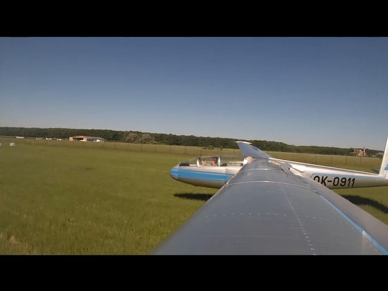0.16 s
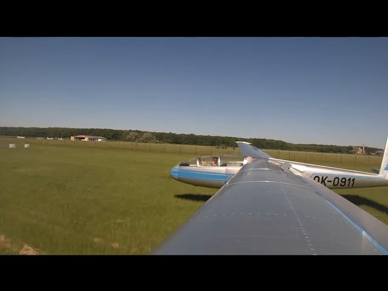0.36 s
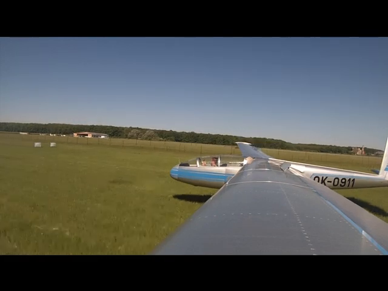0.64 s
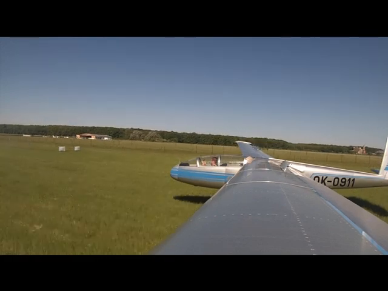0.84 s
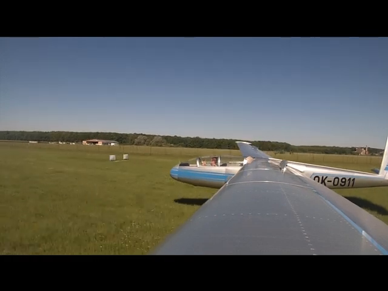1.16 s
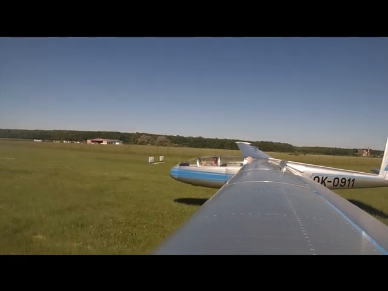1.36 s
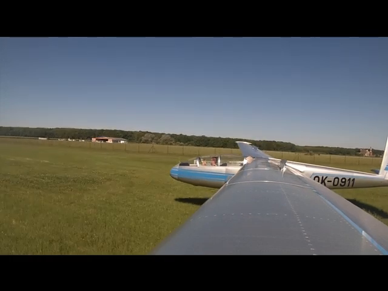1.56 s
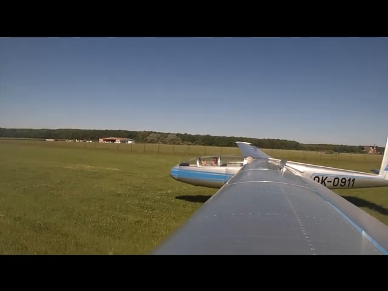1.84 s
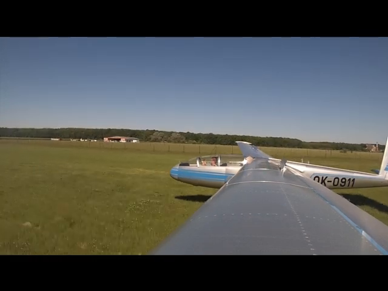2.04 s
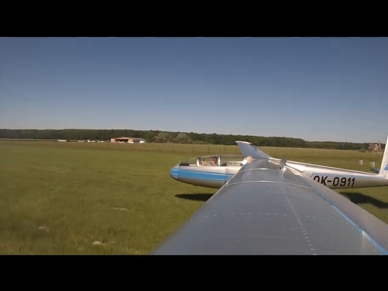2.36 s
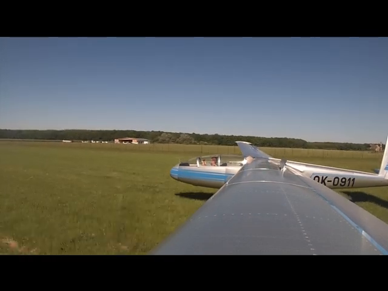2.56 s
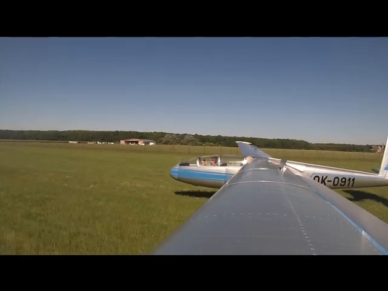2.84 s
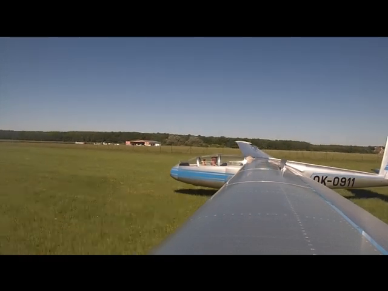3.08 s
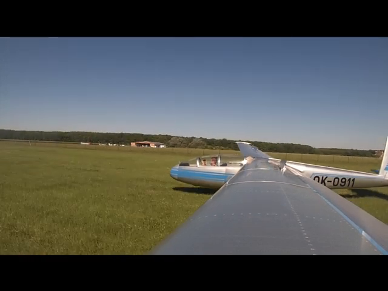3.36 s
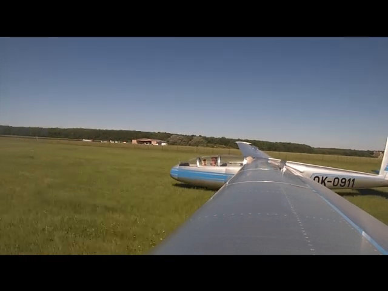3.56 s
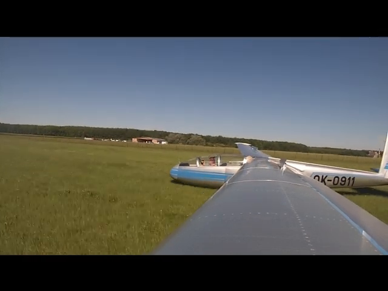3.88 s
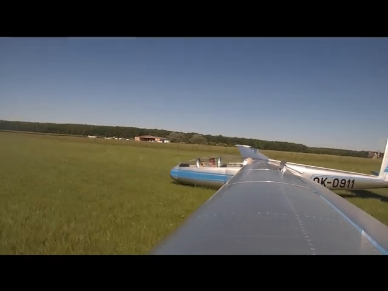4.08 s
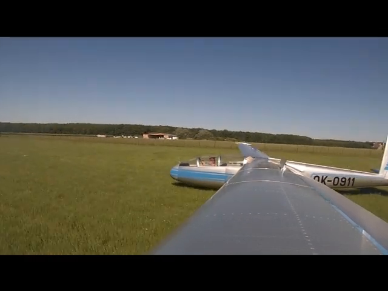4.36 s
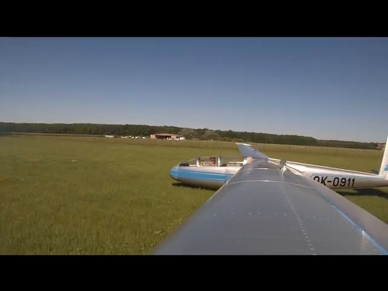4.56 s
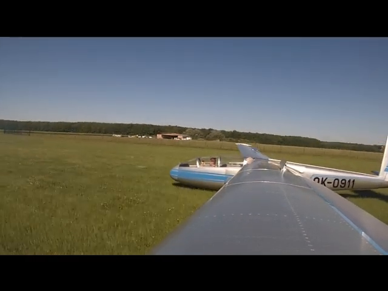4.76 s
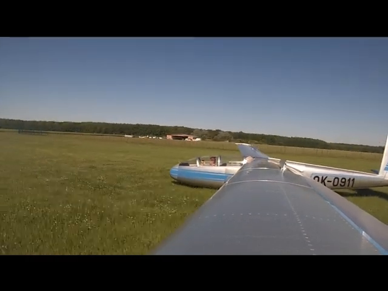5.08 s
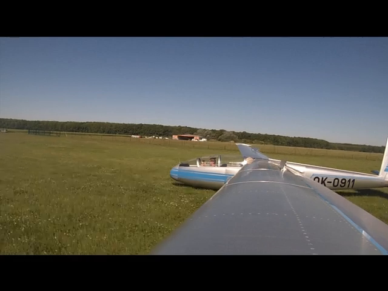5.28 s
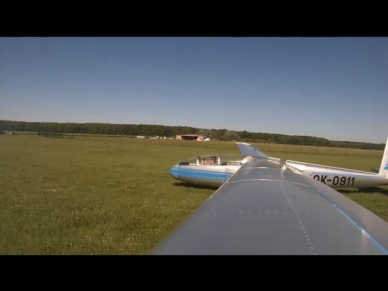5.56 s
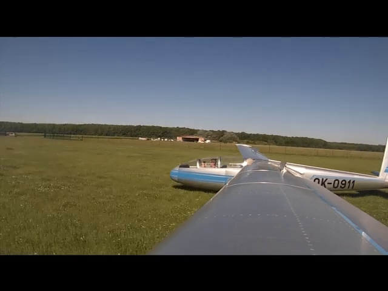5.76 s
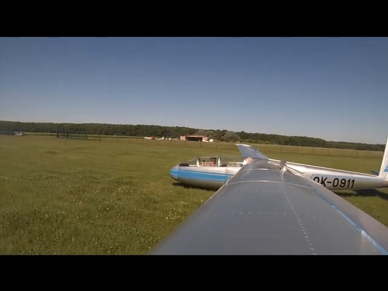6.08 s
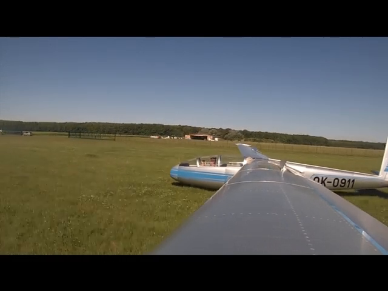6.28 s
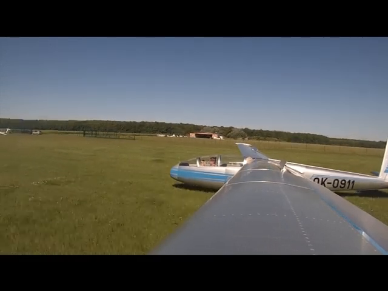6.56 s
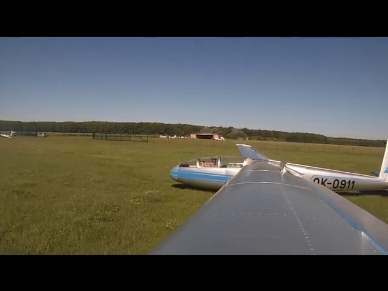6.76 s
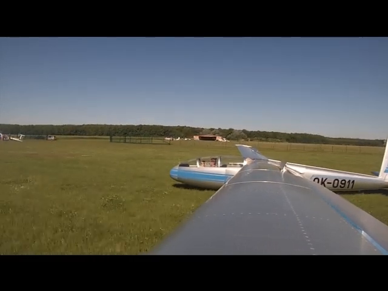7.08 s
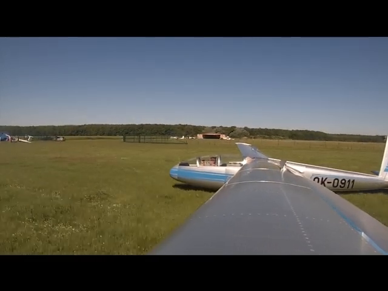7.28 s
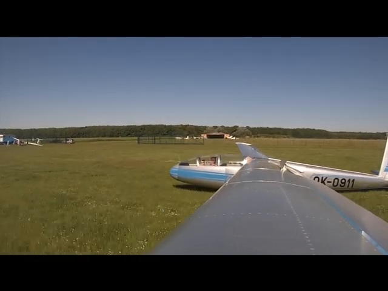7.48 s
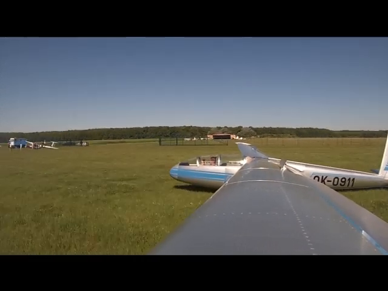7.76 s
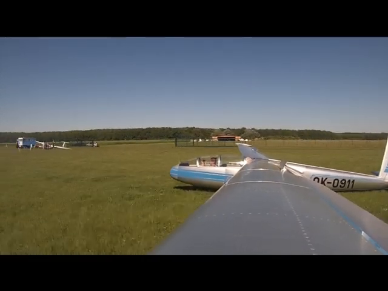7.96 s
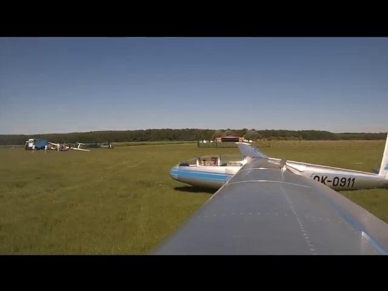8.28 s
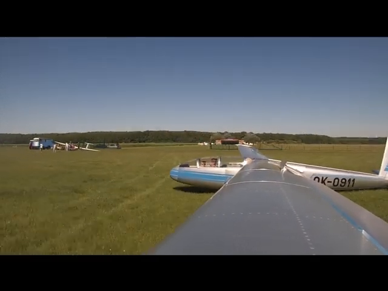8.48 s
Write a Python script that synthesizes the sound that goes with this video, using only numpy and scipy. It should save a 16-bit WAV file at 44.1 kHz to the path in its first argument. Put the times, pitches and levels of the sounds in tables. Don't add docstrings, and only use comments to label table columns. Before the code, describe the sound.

Steady two-tone whistle and airy hiss over a humming, shuddering metal wing, then the whistle dies and rough ground thumps and rattles grow harder.

```python
import sys
import numpy as np
from scipy import signal
from scipy.fft import rfft, irfft, next_fast_len
from scipy.io import wavfile
from scipy.ndimage import uniform_filter1d

SR = 44100
rng = np.random.default_rng(int(sys.argv[2]) if len(sys.argv) > 2 else 0)


def transcribe(u):
    v = np.clip(np.atleast_2d(u).T, -1, 1)
    q = np.round(v * 32767).astype(np.int16)
    wavfile.write(sys.argv[1], SR, q)


def volts_from_db(level):
    exponent = np.asarray(level, float) / 20
    return 10 ** exponent


N = 380583
SIZE = next_fast_len(N)
HZ = np.fft.rfftfreq(SIZE, 1 / SR)

# (time [s], volume drop [dB], thump level [dB])
HARD_PEAKS = [(0.078, 3, -28), (0.393, 0, -22), (1.023, 2, -19), (1.324, 3, -30), (1.978, 3.5, -37.5),
              (2.251, 1, -15.5), (2.509, 4.5, -12), (2.694, 4, -23), (3.041, 3, -16), (3.306, 1, -21),
              (3.681, 4, -12.5), (3.754, 2, -13), (3.846, 2, -9), (4.282, 1, -20), (4.526, 3.5, -12),
              (4.751, 2, -13), (4.865, 1, -23), (5.077, 4, -10), (5.182, 0, -7), (5.419, 3.5, -17),
              (5.65, 3, -15), (6.437, 4.5, -13), (6.562, 2.5, -20), (6.788, 1.5, -19), (6.862, 7.5, -10),
              (7.156, 2, -27), (7.74, 4, -6.5), (8.149, 9, -24), (8.5183, 6, -8.5), (8.632, -16, -10)]
# (time [s], lift [dB], half length [s])
GUSTS = [(.2, 1, 0.033), (.4, 1, 0.069), (.98, 1.5, 0.07), (1.497, 2.5, 0.093), (1.74, 2, 0.037),
         (1.88, 0.5, 0.028), (2.0, 3.5, 0.076), (2.5, 1.5, 0.053), (2.72, 2, 0.095), (3.02, 2.5, 0.057),
         (3.64, 1.5, 0.12), (3.93, 4.5, 0.049), (4.5, 3, 0.038), (4.722, 3.5, 0.026), (4.827, 2.5, 0.018),
         (5.05, 4.5, 0.062), (5.4, 4, 0.064), (5.615, 3, 0.029), (5.76, 1.5, 0.041), (6.004, 2, .04),
         (6.23, 0.5, 0.033), (6.53, 3, .033), (6.752, 3, 0.022), (6.84, 1, 0.017), (6.895, 0, 0.025),
         (7.14, 3.5, 0.014), (7.38, 1, 0.11), (7.69, 2, 0.096), (7.81, 0, .06), (8.12, 5, 0.09),
         (8.19, -3, 0.12), (8.42, 3.5, 0.048), (8.5, 1.5, 0.018), (8.56, -2.5, .04)]


def evened(x):
    return x / np.sqrt(np.mean(x ** 2) + 1e-20)


def columns(rows):
    s, *values = np.transpose(rows)
    return [np.interp(np.arange(N) / SR, s, v) for v in values]


def add(mix, s, sound):
    part = mix[round(s * SR):][:len(sound)]
    part += sound[:len(part)]


def bell(hz, centre_hz, width_hz):
    return 1 / (1 + (2 * (hz - centre_hz) / width_hz) ** 2)


def filtered(x, gain):
    return irfft(rfft(x, SIZE) * gain, SIZE)[:N]


def drift(rate_hz):
    return evened(filtered(rng.standard_normal(N), bell(HZ, 0, 2 * rate_hz)))


def swells(rows):
    t = np.arange(N) / SR
    return sum(height * np.exp(-((t - s) / half) ** 2) for s, height, half in rows)


def surges(rows):
    return swells([(s, volts_from_db(db), half) for s, db, half in rows])


def resting(floating_db, rolling_db):
    touchdown_s, settle_s = 3.7, 0.059
    rolling = np.clip((np.arange(N) / SR - touchdown_s) / settle_s, 0, 1)
    return volts_from_db(floating_db + (rolling_db - floating_db) * rolling)


def shaken(modes, steady):
    shape = np.sqrt(sum(volts_from_db(2 * db) * bell(HZ, hz, width) ** 2 for hz, width, db in modes))
    ring = signal.hilbert(filtered(rng.standard_normal(N), shape), SIZE)[:N]
    swell = np.sqrt(abs(uniform_filter1d(abs(ring) ** 2, 1500)))
    return evened(ring.real / (swell + 0.037 * swell.mean()) ** steady)


def rung(hz, width_hz, rest, surge, wander_hz):
    push = rng.standard_normal(N)
    murmur = evened(filtered(push, bell(HZ, hz, width_hz)))
    wander = evened(filtered(push, bell(HZ, 0, 8.99)))
    tone = np.sqrt(2) * np.sin(2 * np.pi * np.cumsum(hz + wander_hz * wander) / SR)
    quieted = rest * murmur / (1 + 0.7 * surge / rest)
    return quieted + surge * tone, rest + surge


def turbulence(shape_db, patchy_db, flicker_db):
    frames = N // 128 + 8
    a, b, patches = rng.standard_normal((frames, 257, 3)).T
    patches = uniform_filter1d(patches, 8, axis=0)
    patches = evened(uniform_filter1d(patches, 16, axis=1))
    flicker = evened(uniform_filter1d(rng.standard_normal(frames), 4))
    spectra = (a + 1j * b) * volts_from_db(patchy_db * patches + flicker_db * flicker)
    x = signal.istft(spectra, nperseg=512, noverlap=384)[1][:N]
    return evened(filtered(x, volts_from_db(shape_db)))


def wing():
    # (time [s], level [dB], half length [s])
    sways = [(0.045, -21.5, 0.071), (.2, -33, .05), (0.502, -23, .04), (0.757, -24.5, 0.26),
             (1.15, -30, 0.072), (1.4, -26, .04), (2.66, -24.5, 0.031), (2.998, -26, 0.045),
             (3.396, -23.5, .05), (3.952, -27, .06), (6.006, -30.5, .05), (6.75, -32, 0.09),
             (7.1, -31, .06), (8.05, -28, 0.06), (1.293, -27.5, 0.13), (2.022, -18.5, 0.1),
             (2.422, -21.5, 0.13), (2.858, -27, 0.072), (3.179, -18, 0.084), (4.083, -23.5, 0.2),
             (4.574, -22, 0.05), (4.796, -19.5, 0.13), (5.1, -12, 0.026), (5.277, -21, 0.18),
             (5.514, -15, 0.025), (5.714, -15.5, 0.14), (6.043, -23.5, 0.13), (6.473, -23, 0.12),
             (6.915, -18, 0.13), (7.263, -20.5, 0.22), (7.527, -23, 0.024), (7.964, -25, 0.042),
             (8.227, -18, 0.043), (8.516, -23, 0.19)]
    # (time [s], level [dB], half length [s])
    rocks = [(2.423, -35, 0.13), (3.749, -23.5, 0.19), (3.956, -26, 0.028), (4.334, -20, 0.036),
             (4.45, -29, 0.15), (4.729, -44, 0.15), (5.062, -27, 0.26), (5.37, -31, 0.06),
             (6.34, -30.5, 0.2), (6.57, -22, 0.06), (6.795, -27, 0.21), (7.149, -41, 0.1),
             (7.45, -26, 0.079), (7.79, -15.5, 0.054), (8.037, -25, 0.036), (8.481, -27, 0.17)]
    # (time [s], level [dB], half length [s])
    twists = [(0.08, -23, 0.027), (0.166, -16.5, 0.11), (0.268, -23, 0.034), (0.51, -21.5, 0.11),
              (0.785, -23, 0.13), (1.03, -22, 0.024), (1.093, -17, 0.094), (1.238, -18.5, 0.021),
              (1.312, -17.5, 0.03), (1.558, -33, 0.03), (1.72, -20, 0.27), (2.073, -20.5, 0.059),
              (2.258, -15, 0.054), (2.348, -23.5, 0.022), (2.534, -15, 0.068), (2.708, -12, 0.043),
              (2.778, -26.5, 0.03), (2.887, -18.5, 0.05), (3.055, -16, 0.044), (3.114, -25, 0.031),
              (3.277, -23, 0.03), (3.436, -16.5, 0.19), (3.657, -24, 0.036), (3.767, -15.5, 0.032),
              (3.842, -23, 0.03), (3.95, -19.5, 0.031), (4.164, -22.5, 0.037), (4.285, -20, 0.028),
              (4.422, -33, 0.032), (4.533, -20.5, 0.03), (4.608, -18, 0.022), (4.85, -19, 0.026),
              (5.044, -22, 0.027), (5.42, -32, 0.03), (6.014, -16.5, 0.029), (6.157, -22, 0.027),
              (6.281, -28, 0.061), (6.537, -22, 0.047), (6.766, -25.5, 0.23), (7.022, -22, 0.032),
              (7.122, -30, 0.023), (7.613, -23.5, 0.025), (7.678, -20, 0.079), (7.812, -28, 0.028),
              (7.936, -16.5, 0.036), (8.063, -21, 0.03), (8.156, -16, 0.032), (8.255, -16.5, 0.023),
              (8.374, -30, 0.024), (8.509, -17, 0.029)]
    # (time [s], level [dB], half length [s])
    throbs = [(0.078, -27.5, 0.052), (0.233, -21.5, 0.018), (0.583, -21, 0.016), (0.878, -23, 0.021),
              (1.013, -24, 0.02), (8.547, -27, 0.036), (1.258, -22, 0.014), (1.45, -34, 0.014),
              (1.592, -28.5, 0.031), (1.77, -20, 0.017), (1.93, -29, 0.17), (2.223, -25, 0.011),
              (2.353, -19.5, 0.02), (2.457, -23, 0.014), (2.683, -20.5, 0.014), (2.795, -15.5, 0.016),
              (3.02, -25.5, 0.18), (3.189, -25.5, 0.015), (3.332, -18, 0.023), (3.615, -24.5, 0.021),
              (3.682, -17, 0.014), (3.744, -21, 0.07), (3.951, -26, 0.077), (4.149, -19, 0.016),
              (4.243, -22.5, 0.033), (4.317, -24, 0.033), (4.431, -20, 0.017), (4.516, -26, 0.017),
              (4.64, -19.5, 0.028), (4.736, -18, 0.026), (4.828, -18, 0.015), (4.925, -21.5, 0.024),
              (4.987, -28, 0.03), (5.104, -19, 0.018), (5.257, -20.5, 0.028), (5.37, -24, 0.017),
              (5.432, -23, 0.015), (5.456, -14, 0.019), (5.617, -31, .04), (6.264, -23, 0.043),
              (6.387, -19, 0.024), (6.497, -21.5, 0.084), (6.652, -24.5, 0.021), (6.69, -21, 0.029),
              (6.763, -17, 0.019), (7.043, -17.5, 0.048), (7.155, -25, 0.045), (7.352, -21.5, 0.02),
              (7.424, -27, 0.013), (7.711, -18.5, 0.0096), (7.5, -25.5, 0.021), (7.806, -22, 0.043),
              (7.92, -23.5, 0.014), (8.015, -25, 0.048), (8.097, -21, 0.012), (8.165, -18, 0.058),
              (8.33, -18.5, 0.02), (8.415, -20.5, 0.024)]
    # (frequency [Hz], width [Hz], level [dB])
    skin_modes = [(175.6, 18.7, 1.5)]
    # (frequency [Hz], width [Hz], level [dB])
    panel_modes = [(153.3, 25, 2.5), (98, 25, -3.5), (213, 33, -13), (276, 51, -16)]

    swing = shaken([(22.9, 6.3, 0)], steady=0.42)
    pointed = swing + 0.16 * (swing ** 2 - 1)
    bending = (resting(-32, -29) + surges(sways)) * pointed
    mount = (resting(-40, -28) + surges(rocks)) * shaken([(40.2, 18.3, 0)], steady=0.13)
    twisting, _ = rung(65, 16, resting(-24.5, -27) + surges([(0, -90, 1)]), surges(twists), wander_hz=1.8)

    skin_hz, skin_width_hz, _ = skin_modes[0]
    skin_rest = resting(-30, -31) + surges([(0, -90, 1)])
    skin, drumming = rung(skin_hz, skin_width_hz, skin_rest, surges(throbs), wander_hz=3)
    beat_hz = 9.5 * (1 + 0.419 * drift(1.53))
    skin = skin * volts_from_db(2.7 * np.sin(2 * np.pi * np.cumsum(beat_hz) / SR))

    roughness = uniform_filter1d(drumming, 9000)
    panels = volts_from_db(-7.5) * roughness * shaken(panel_modes, steady=0.4)
    return bending + mount + twisting + skin + panels


def skin_bursts():
    # (time [s], peak level [dB], frequency [Hz], swell length [s])
    bursts = [(2.3, -11.5, 191, 0.044), (7.703, -10.5, 142, 0.024), (7.7, -25, 380, 0.023),
              (7.705, -27, 280, 0.027), (8.1188, -4, 185, 0.03), (8.405, -28, 410, 0.032),
              (14, -23, 261, 0.023), (7.4, -29, 563, .03), (8.1, -30, 377, 0.047), (8.122, -29, 656, .02),
              (6, -28, 290, .03), (8.2, -25, 210, 0.023), (6.34, -33, 235, 0.045), (5.58, -27, 250, .03)]
    out, t = np.zeros(N), np.arange(2000) / SR
    for s, db, hz, length in bursts:
        swell = np.sin(np.pi * np.clip(t / length, 0, 1))
        add(out, s, volts_from_db(db) * swell * np.tanh(0.7 * np.sin(2 * np.pi * hz * t)))
    return out


def low_thumps(swing):
    out, t = np.zeros(N), np.arange(2000) / SR
    u = (t - .012) / .0022
    for s, _, db in HARD_PEAKS:
        way = np.sign(swing[round((s - .004) * SR)])
        add(out, s - .016, way * volts_from_db(db) * (1 - u ** 2) * np.exp(-u ** 2 / 2))
    slam_s, slam_db = 8.1445, -3.5
    add(out, slam_s - .012, -volts_from_db(slam_db) * np.exp(-u ** 2))
    return out


def loose_ticks():
    # (time [s], peak level [dB], frequency [Hz])
    ticks = [(4.523, -34, 1610), (5.575, -25, 1380), (5.644, -25, 1480), (6.857, -38, 1280),
             (7.703, -31, 1150), (7.735, -32, 1020), (7.823, -31, 1220), (8.125, -28, 1390),
             (8.144, -32, 902), (8.514, -40, 921), (.006, -14, 1400), (0.023, -12, 1900),
             (5.049, -22, 1580), (5.4795, -26, 1410), (5.7215, -40, 1350), (5.7434, -32, 1350),
             (5.7938, -29, 1440), (5.9165, -39, 1440), (6.8978, -31, 1410), (7.13, -30, 1120),
             (7.1407, -27, 1370), (7.2121, -37, 1400), (7.8915, -34, 1440), (8.0138, -29, 1320),
             (7.8232, -34, 2300), (7.738, -44, 4000), (8.121, -34, 2100), (8.138, -29, 1500),
             (8.143, -46, 5500), (8.507, -29, 1640), (8.514, -38, 4000)]
    out, t = np.zeros(N), np.arange(2000) / SR
    rise = np.minimum(t / .0012, 1)
    for s, db, hz in ticks:
        snap = rng.standard_normal(len(t))
        snap = uniform_filter1d(snap, size=max(round(14000 / hz), 1))
        ring = volts_from_db(db + 4.0 - 60 * t / 0.022) * np.sin(2 * np.pi * hz * t)
        crack = volts_from_db(db - 10 - 60 * t / 0.0059) * snap
        add(out, s, rise * (ring + crack))
    return out


def colour_curve(points):
    hz, db = np.transpose(points)
    return np.interp(np.log(HZ + 1), np.log(hz), db)


def airflow():
    # (time [s], level [dB])
    air = [(0, -27), (.75, -28.5), (1.85, -27), (2.3, -26.5), (3.2, -25), (3.5, -29.5), (3.74, -29),
           (3.84, -36.5), (4.05, -41.5), (4.3, -40), (4.9, -37.5), (5.62, -44), (6.13, -46.5), (6.25, -44),
           (6.9, -41), (7.15, -47), (7.7, -46), (8.63, -43.5)]
    # (time [s], lift [dB], half length [s])
    blasts = [(.2, -1, 0.11), (1.5, 1.5, 0.1), (1.88, 3.5, 0.063), (2.6, 2, 0.099), (.8, 3, 0.066),
              (2.3, 2, .08), (2.9, 2.5, 0.14), (3.15, 4.5, 0.068), (4.35, 0, 0.045), (7.85, 2.5, .08),
              (8.1, 4.5, .05), (3.76, 4, 0.041), (4.95, 3.5, 0.055), (5.5, 2, .06), (5.62, -2, .05),
              (6.13, -4, 0.044), (6.25, -0.5, .06), (6.56, 1, .04), (7.415, -3, .025), (7.52, 3, 0.066),
              (7.72, 0, 0.026), (7.63, -6, 0.081), (8.28, 5, 0.21), (8.45, 3, 0.072), (8.6, 3.5, 0.07)]
    # (time [s], lift [dB], half length [s])
    brushes = [(.04, 1, 0.06), (.6, 0.5, .1), (2.2, 0.5, 0.084), (3.3, 0.5, .1), (4.12, 0.5, .05),
               (5.65, 1, 0.036), (6.3, 1, .2), (7.0, 1, 0.074), (7.3, 2, 0.35), (7.55, 0, 0.075),
               (7.7, 1.5, .04), (7.97, 1.5, .06), (8.51, 3.5, .01)]
    # (frequency [Hz], level per Hz [dB])
    hiss_colour = [(300, -14.5), (700, -8.5), (1000, -8.5), (1400, -6.5), (2000, -10), (3200, -20.5),
                   (5000, -29), (6000, -29), (8000, -26.5), (10000, -38), (13000, -43), (15000, -55),
                   (15300, -83)]
    # (frequency [Hz], level per Hz [dB])
    buffet_colour = [(10, -27), (20, -17), (100, 4), (250, -7), (500, -8.5), (900, -20.5), (1300, -17),
                     (2000, -61)]
    # (frequency [Hz], width [Hz], level [dB])
    housing = [(983, 120, -6.5), (1150, 34, 5), (1810, 130, 3), (2210, 130, 2.5), (2530, 200, 6),
               (3010, 110, 3), (3240, 150, -3), (3510, 120, 4), (4040, 120, -2), (4250, 180, 5),
               (4760, 160, 5.5), (5330, 970, 8), (5840, 300, -5.5), (5950, 110, -0.5), (7130, 600, 1.5),
               (7680, 190, -5), (7930, 300, 1), (9060, 250, -3), (9550, 400, 2), (11200, 800, 4.5),
               (12100, 250, 0.5), (12600, 600, 2)]
    # (frequency [Hz], width [Hz], level [dB])
    flaps = [(240.6, 13, 9), (279, 16, 0), (404, 28, 4)]

    flow_db, gust_db = columns(air)[0], swells(GUSTS)
    hiss_db = flow_db + gust_db
    above_calm_db = flow_db + 42

    colour_db = colour_curve(hiss_colour) + sum(db * bell(HZ, hz, width) for hz, width, db in housing)
    hiss = volts_from_db(hiss_db + swells(brushes) + 4) * turbulence(colour_db, patchy_db=0.64, flicker_db=0.79)
    fizz = filtered(hiss, 1 / (1 + (11000 / (HZ + 1)) ** 6))
    hiss = hiss - np.clip(-.025 * (hiss_db + 47), 0, .6) * fizz

    howl_db = 6 + 0.092 * above_calm_db - 0.58 * np.arange(N) / SR
    port_db = 20 * np.log10(bell(HZ, 1445, 307))
    howl = volts_from_db(hiss_db + howl_db - 2) * turbulence(port_db, patchy_db=1.0, flicker_db=1.3)

    jolts = surges([(s, thump_db, 0.06) for s, _, thump_db in HARD_PEAKS])
    buffet_db = -41 + 0.73 * above_calm_db + 0.78 * gust_db + 6.5 * jolts + swells(blasts)
    colour_db = colour_curve(buffet_colour) + sum(db * bell(HZ, hz, width) for hz, width, db in flaps)
    buffet = volts_from_db(buffet_db + 4.5) * turbulence(colour_db, patchy_db=1.38, flicker_db=1.2)
    return hiss + howl + buffet


def whistle():
    # (time [s], first tone level [dB], second tone level [dB])
    tone_levels = [
        (0, -24, -18),
        (.45, -27.5, -19),
        (.85, -28, -20.5),
        (1.55, -26.5, -19),
        (1.75, -29.5, -23.5),
        (2.6, -25, -20.5),
        (3.045, -25, -22),
        (3.1, -37, -29),
        (4.0, -41, -43),
    ]
    # (time [s], frequency [Hz])
    gap_pitch = [
        (0.0, 675.8),
        (0.33, 676),
        (0.96, 669.4),
        (1.0, 676.6),
        (1.54, 674),
        (1.67, 667.8),
        (2.01, 677),
        (2.11, 673.3),
        (3.05, 676),
    ]
    # (time [s], lift [dB], half length [s])
    locks = [(.38, 4, 0.022), (.65, 1.5, 0.04), (.85, -0.5, 0.051), (1.0, 1, 0.046), (.16, -0.5, .05),
             (.75, -1, .04), (1.2, 0.5, 0.056), (1.36, -1.05, 0.07), (1.5, 0, 0.03), (2.08, 1.5, 0.043),
             (2.4, 0.5, .05), (2.55, 2, 0.045), (2.66, 1.5, 0.046), (1.62, 1.5, 0.049), (1.74, -3, 0.038),
             (1.95, -1, 0.057), (2.2, -1.5, 0.072), (2.82, -4, 0.12), (3.01, 2, 0.035), (3.17, -2.5, 0.033),
             (3.5, 2.5, 0.095), (3.75, -6, 0.081), (3.99, -5, 0.028)]

    first_db, second_db = columns(tone_levels)
    gust_db, lock_db = swells(GUSTS), swells(locks)
    hz = columns(gap_pitch)[0] + 0.35 * (gust_db + lock_db)
    turn = 2 * np.pi * np.cumsum(hz * (1 + 0.0027 * drift(9))) / SR
    first = volts_from_db(first_db + 1.2 * drift(23)) * np.sin(turn)
    second = volts_from_db(second_db + 1.9 * drift(35) + 0.5 * lock_db) * np.sin(2 * turn + 0.1 * drift(30))
    die_s = 0.079
    fade = np.clip(1 + (tone_levels[-1][0] - np.arange(N) / SR) / die_s, 0, 1)
    return np.sqrt(2) * fade * volts_from_db(0.94 * gust_db + lock_db) * (first + second)


def scene():
    hum = volts_from_db(2.0) * wing()
    bursts = skin_bursts()
    thumps = low_thumps(hum + bursts)
    return (hum + bursts + thumps + loose_ticks() + airflow() + whistle())[None]


def top_cut(x):
    return signal.sosfilt(signal.butter(12, 15120, fs=SR, output="sos"), x)


def record(dry):
    t, duck_db = np.arange(N) / SR, np.zeros(N)
    fall_s, back_s = .003, 0.13
    for s, db, _ in HARD_PEAKS:
        since = np.maximum(t - s + fall_s, 0)
        duck_db += db * np.minimum(since / fall_s, 1) * np.exp(-(since / back_s) ** 0.86)
    stair = 9
    stairs_db = uniform_filter1d(duck_db[np.arange(N) // stair * stair], size=2)
    x = dry * volts_from_db(-0.5 * (duck_db + stairs_db))
    limited = 1.35 * np.tanh(x / 1.388)
    return top_cut(limited)


dry = scene()
out = record(dry)
transcribe(out)
```